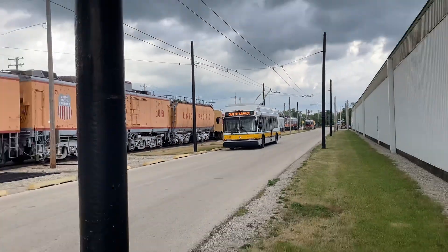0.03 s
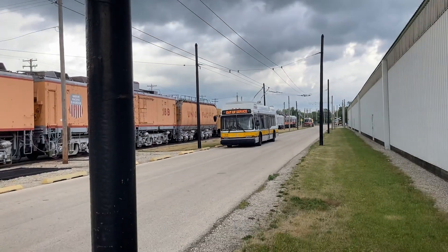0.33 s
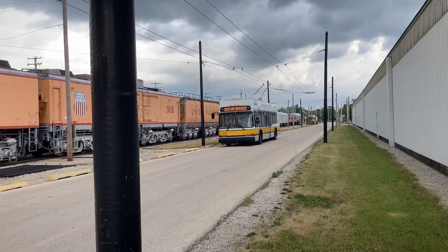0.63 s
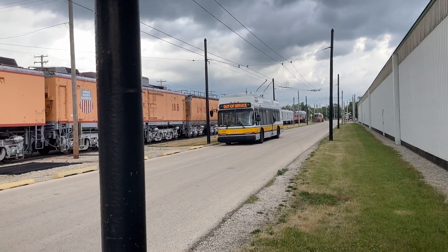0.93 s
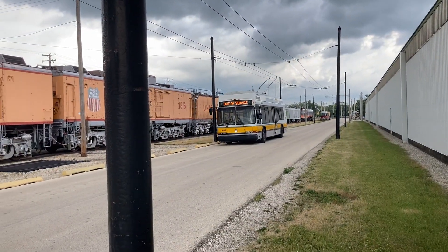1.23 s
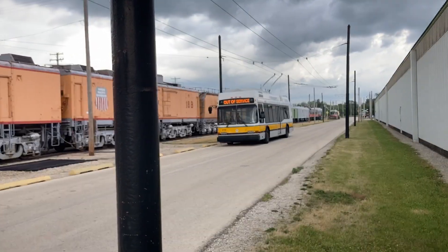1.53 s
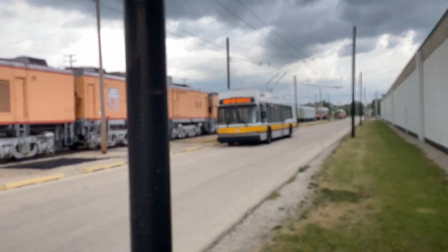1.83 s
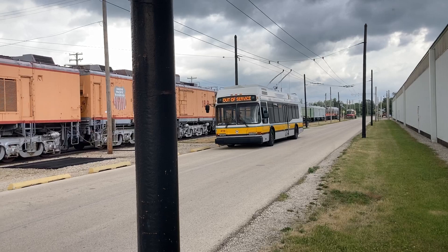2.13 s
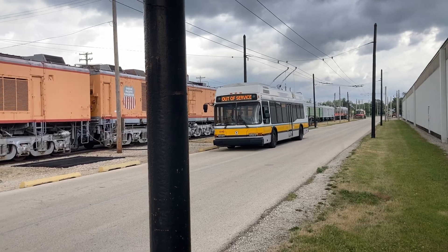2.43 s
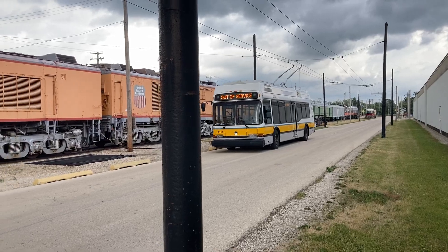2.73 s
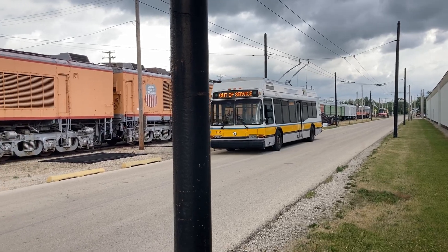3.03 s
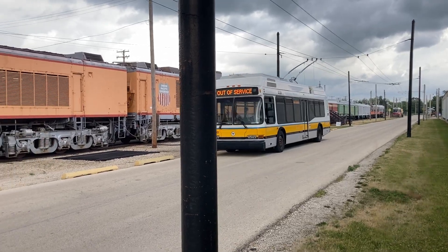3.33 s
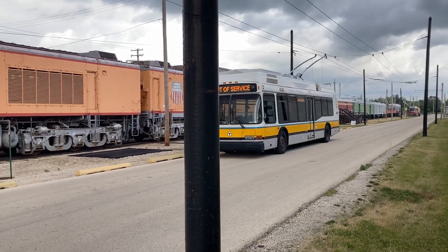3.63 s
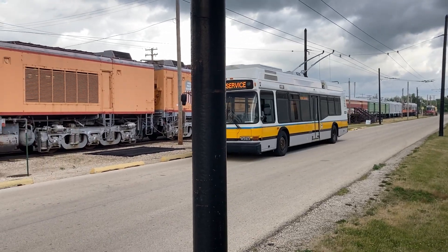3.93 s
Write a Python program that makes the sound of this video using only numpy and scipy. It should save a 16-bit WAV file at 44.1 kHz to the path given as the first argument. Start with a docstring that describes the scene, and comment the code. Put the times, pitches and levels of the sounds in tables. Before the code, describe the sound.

A trolley bus rolls closer outdoors with a low throbbing hum and growing tyre rush, its collectors ticking and singing thinly on the wires. Dull wheel thuds come near 0.8, 2.3 and 2.9 seconds. The motor tone sinks slowly, and a pulsing whirr opens up after 2 seconds. At about 3.2 seconds compressed air spurts softly and settles to a hiss; a hollow body boom swells around 3.8 seconds.

```python
"""A trolley bus rolls slowly closer along a yard road, between parked rail cars and a shed wall.
From the start its machinery throbs in three low tones, the tyres rush and thud, and the collector
shoes tick and sing thinly on the wires. The drive tone sinks as the bus slows. After two seconds
the drive's whirr opens up; just past three, compressed air spurts and settles to a hiss.
Last comes a hollow boom from the body, now close by."""
import sys
import numpy as np
from scipy import signal
from scipy.fft import rfft, irfft, next_fast_len
from scipy.io import wavfile
from scipy.ndimage import uniform_filter1d, map_coordinates

SR = 44100
rng = np.random.default_rng(int(sys.argv[2]) if len(sys.argv) > 2 else 0)


def master_out(mix):
    """Clip the mix to full scale and print it as 16-bit PCM to the path in sys.argv[1]."""
    frames = np.transpose(np.atleast_2d(mix))
    ceiling = np.clip(frames, -1, 1)
    pcm = np.round(ceiling * 32767).astype(np.int16)
    wavfile.write(sys.argv[1], SR, pcm)


N = 176400

# Noise colours, each (frequency [Hz], relative level [dB])
YARD_COLOUR = [(120, -16.5), (250, -9), (345, -7.5), (440, -17), (520, -11.5), (680, -13.5), (820, -14.5),
               (1100, -12), (1550, -21), (2150, -22), (2500, -26), (2900, -25.5), (3300, -29), (4300, -29),
               (5500, -34.5), (8000, -45)]  # distant outdoor wash
FIZZ_COLOUR = [(4000, -34), (5800, -6), (7000, 4.5), (8500, 1), (11500, 2.5), (15500, -6.5)]  # high hiss over the yard
AIR_COLOUR = [(2500, -16), (5000, -4.5), (7200, -2.5), (11000, -1.5), (15500, -4.5)]  # escaping compressed air
TYRE_COLOUR = [(100, -15), (190, 1.5), (300, -14), (400, -9.5), (640, -5.5), (820, -15.5), (1150, -16),
               (1500, -14.5), (2300, -23), (3300, -32), (6000, -64), (15000, -88)]  # tyres on the road
RUMBLE_COLOUR = [(18, -38), (30, -20), (45, -10.5), (68, -4), (95, -5), (118, -10), (160, -16.5),
                 (230, -12), (290, -24), (500, -26.5)]  # the rolling body
BOOM_COLOUR = [(70, -6.5), (120, 4), (165, -1.5), (215, -4), (270, -18), (400, -25)]  # hollow boom of the body up close
KNOCK_COLOUR = [(25, -11), (45, -1), (90, -3), (150, -1.5), (200, -11), (260, -30)]  # dull knock inside a thud

# Stereo images, each (frequency [Hz], left-right correlation [-1 to 1])
YARD_IMAGE = [(60, 0.71), (140, 0.9), (260, 0.86), (500, 0.27), (1000, -0.086), (2000, 0.029),
              (4000, -0.26)]  # centred lows, wide highs
HISS_IMAGE = [(4000, -.2), (6000, -.37), (7000, -.88), (15000, -.88)]  # very wide, largely out of phase
TYRE_IMAGE = [(200, 0.97), (600, 0.7), (1000, 0.11), (1700, 0.5), (3000, 1), (6000, 0.16)]

# Shoes snapping on the wire (time [s], level [dB], centre [Hz], width [octaves], crack length [s])
SHOE_TICKS = [(0.119, -47.5, 4170, .15, 0.0013), (.175, -54, 4940, .12, 0.0012),
              (.404, -57, 3500, .42, .0015), (.682, -53, 4200, .4, .0015),
              (.988, -47.5, 6000, 0.27, 0.0012), (1.079, -58, 6960, .23, .0015),
              (1.422, -50.5, 5800, 0.29, 0.0017), (1.795, -58, 4000, .3, 0.0013),
              (2.062, -49, 4580, 0.14, 0.00097), (2.713, -47.5, 4650, 0.41, 0.0012),
              (3.073, -54, 3170, 0.064, .008), (3.376, -52.5, 7000, 0.15, .0015),
              (3.886, -53, 3230, 0.36, 0.0037)]
# Singing modes of wire and shoe (frequency [Hz], level [dB])
WIRE_MODES = [(2947, -74), (3560, -70.5), (3594, -69.5), (3731, -73.5), (4651, -76), (4915, -77.5),
              (5647, -78), (6115, -78), (6708, -79), (7849, -76)]
# Chirps where one mode swells (time [s], frequency [Hz], level [dB])
WIRE_CHIRPS = [(.69, 5647, -67), (.96, 4915, -69), (1.36, 3594, -63), (1.6, 3594, -58), (1.85, 3594, -62),
               (1.87, 3731, -69), (1.87, 5647, -66), (2.09, 5647, -70), (2.12, 3594, -65), (2.3, 3594, -60),
               (2.5, 3594, -66), (2.75, 3731, -61), (2.77, 6115, -67), (3.22, 6708, -65), (3.45, 5647, -71),
               (3.64, 5647, -68), (3.7, 4915, -61.5), (3.75, 3594, -62)]
# Whirring resonances of the drive (frequency [Hz], width [Hz], level when near [dB])
WHIRR_BANDS = [(1098, 62, -57.5), (1248, 38, -66), (1701, 65, -59.5), (1799, 91, -63), (2336, 51, -70.5),
               (2240, 82, -80)]
# Tone of the drive motor (time [s], pitch [Hz], level [dB])
DRIVE_CURVE = [(0, 259, -50.5), (0.8, 254, -51), (1.4, 251, -51.5), (1.95, 246, -53), (2.45, 243, -45),
               (2.8, 241, -51.5), (3.0, 239.5, -44.5), (3.38, 236.7, -37), (3.62, 235, -43.5),
               (4, 231, -49.5)]
# Low thuds (time [s], peak level [dB], half-width [s])
WHEEL_THUDS = [(0.617, -38, 0.0091), (0.813, -29, 0.019), (2.252, -27.5, 0.029), (2.635, -37, 0.015),
               (2.883, -32, 0.032)]
# Hum of the machinery (starting pitch [Hz], level [dB])
HUM_TONES = [(63.6, -36.5), (76.3, -35.5), (97.5, -37), (334.8, -54.5), (411, -70), (1005, -65),
             (2110, -67), (2148, -66.5)]


def amp(db):
    """Decibels to gain."""
    return 10 ** (np.asarray(db) / 20)


def unit(x):
    """Scale to rms 1."""
    return x / np.sqrt(np.mean(x ** 2) + 1e-20)


def clock():
    """Seconds at each sample."""
    return np.arange(N) / SR


def along(points, hz):
    """Read a (frequency, value) curve on a log frequency axis."""
    freqs, values = np.transpose(points)
    return np.interp(np.log(hz + 1), np.log(freqs + 1), values)


def wobble(rate):
    """Smooth random modulation, rate knots a second."""
    return map_coordinates(rng.standard_normal(2048), [clock() * rate], mode="wrap")


def swell(at_s, half_width_s):
    """A bell-shaped envelope."""
    return np.exp(-.5 * ((clock() - at_s) / half_width_s) ** 2)


def filtered(x, response):
    """Equalise x with a gain given as a function of frequency."""
    size = next_fast_len(N + SR // 4)
    return irfft(rfft(x, size) * response(np.fft.rfftfreq(size, 1 / SR)), size)[..., :N]


def rush(colour, image, patchy_db, left_lead_s=0):
    """Coloured stereo noise of rms 1, textured with patches of random gain."""
    grains = signal.stft(rng.standard_normal((2, N)), nperseg=512)[2]
    patches = uniform_filter1d(rng.standard_normal(grains.shape[1:]), size=4, axis=0)
    patches = uniform_filter1d(patches, size=14, axis=1)
    noise = signal.istft(grains * amp(patchy_db * unit(patches)), nperseg=512)[1][:, :N]
    spread = lambda hz: np.arccos(np.clip(along(image, hz), -1, 1)) / 2
    # the colour rolls off above its last point
    eq = lambda hz: amp(along(colour, hz)) / np.maximum(1, hz / colour[-1][0]) ** 2
    mid, side = filtered(noise, lambda hz: eq(hz) * [np.cos(spread(hz)), np.sin(spread(hz))])
    # the left side is shifted in time only above 810 Hz
    left = filtered(mid + side, lambda hz: np.exp(2j * np.pi * hz * left_lead_s * (hz > 810)))
    return unit(np.array([left, mid - side]))


def hiss(colour):
    """Wide, lightly textured noise, the right side slightly ahead."""
    return rush(colour, HISS_IMAGE, patchy_db=1.8, left_lead_s=-.000227)


def tone(hz, scatter, rate):
    """A stereo tone of rms 1: the direct sound plus wandering reflections at each ear."""
    phase = 2 * np.pi * (np.cumsum(hz * np.ones(N)) / SR + rng.random())
    reflections = [wobble(rate) * np.sin(phase) + wobble(rate) * np.cos(phase) for ear in range(2)]
    return unit(np.sin(phase) + scatter * np.array(reflections))


def yard():
    """The bed: a drifting, distant outdoor wash under a smooth high hiss."""
    wash = amp(-47 + 1.1 * wobble(4)) * rush(YARD_COLOUR, YARD_IMAGE, patchy_db=1.5)
    return wash + amp(-63.5) * hiss(FIZZ_COLOUR)


def compressed_air():
    """Compressed air starts with a spurt and settles to a thin hiss."""
    start_s, attack_s, settle_s = 3.19, 0.11, 0.061
    age = clock() - start_s
    fade_in = np.clip(age / attack_s, 0, 1)
    spurt_db = 5 * np.exp(-np.maximum(age - attack_s, 0) / settle_s)
    return fade_in * amp(-59 + spurt_db + .5 * wobble(21)) * hiss(AIR_COLOUR)


def shoe_ticks():
    """The shoes snap over the wire: a hard crack, its slap off the road and a brief ring."""
    slap_s, slap_db = 0.0054, -9.5
    ring_t60_s, ring_db = .08, -12
    out = np.zeros((2, N))
    for at_s, db, centre, octaves, length in SHOE_TICKS:
        age = clock() - at_s
        crack = lambda delay: np.abs(age - delay - length / 2) < length / 2
        ring = (age > 0) * amp(ring_db - 60 * np.maximum(age, 0) / ring_t60_s)
        envelope = uniform_filter1d(crack(0) + amp(slap_db) * crack(slap_s) + ring, size=32)
        bandpass = lambda hz: np.exp(-.5 * (np.log2((hz + 1) / centre) / octaves) ** 2)
        band = filtered(rng.standard_normal((2, N)), bandpass)
        out += amp(db) * envelope * unit(band + .5 * band[::-1])  # crossfeed narrows the image
    return out


def wire_singing():
    """Sliding shoes stir thin metal modes in rough bursts; now and then one swells into a chirp."""
    flutter_hz, swing_db = 15, 6
    ring = lambda hz: tone(hz + flutter_hz * wobble(200), scatter=.8, rate=50)
    bursts = lambda: amp(swing_db * np.tanh(wobble(19)))
    shimmer = sum(amp(db) * unit(bursts() * ring(hz)) for hz, db in WIRE_MODES)
    chirps = sum(amp(db) * swell(at_s, half_width_s=0.045) * ring(hz) for at_s, hz, db in WIRE_CHIRPS)
    return shimmer + chirps


def drive_whirr():
    """Narrow bands pulse with each turn of the drive and open up once the bus is close."""
    open_s, rise_s, far_db = 2.11, 0.42, -7.5
    pulse_hz, pulse_db = 14.9, 5.5
    far = 1 - np.clip((clock() - open_s) / rise_s, 0, 1)
    turn = np.sin(2 * np.pi * pulse_hz * clock() + 0.68 * wobble(2.9))
    tremolo = unit(amp(pulse_db * turn + 2.7 * wobble(11)))
    bands = sum(amp(db) * tone(hz, scatter=1.1, rate=1.9 * width) for hz, width, db in WHIRR_BANDS)
    return amp(far_db * far) * tremolo * bands


def drive_motor():
    """The motor's tone sinks with the falling road speed."""
    times, pitch_hz, level_db = np.transpose(DRIVE_CURVE)
    glide = np.interp(clock(), times, pitch_hz)
    return amp(np.interp(clock(), times, level_db)) * tone(glide, scatter=0.14, rate=9.8)


def rolling():
    """Tyre noise grows as the distance shrinks, over a steady body rumble."""
    start_m, speed_m_per_s, offset_m = 39.8, 7.35, 8.2
    distance_m = np.hypot(start_m - speed_m_per_s * clock(), offset_m)
    approach = amp(-43 + 0.097 * wobble(6.4)) * 15 / distance_m  # level set at 15 m
    tyres = approach * rush(TYRE_COLOUR, TYRE_IMAGE, patchy_db=3, left_lead_s=0.0004)
    rumble = amp(-38) * rush(RUMBLE_COLOUR, YARD_IMAGE, patchy_db=3)
    return tyres + rumble


def body_boom():
    """The body gives one hollow boom when the bus is close."""
    return amp(-39.5) * swell(at_s=3.78, half_width_s=0.23) * rush(BOOM_COLOUR, YARD_IMAGE, patchy_db=1)


def wheel_thuds():
    """Short bumps, as of wheels over road seams: the body's lowest mode plus a dull knock."""
    bumps = sum(amp(db) * swell(at_s, half_width_s) for at_s, db, half_width_s in WHEEL_THUDS)
    body_mode = tone(hz=57, scatter=0.11, rate=11)
    knock = amp(-5.5) * rush(KNOCK_COLOUR, YARD_IMAGE, patchy_db=-0.5)
    return bumps * (body_mode + knock)


def machinery():
    """Low tones beat into a throb, higher ones arrive more scattered; all sag as the bus draws near."""
    sag_from_s, sag_per_s = 2.2, 0.00867
    sag = 1 - sag_per_s * np.maximum(clock() - sag_from_s, 0)
    return sum(amp(db) * tone(hz * sag, scatter=.12 * hz / 100, rate=4 + hz / 100) for hz, db in HUM_TONES)


def scene():
    """The bus, panned a touch to the right, over the yard bed."""
    bus = machinery() + drive_motor() + rolling() + drive_whirr() + body_boom() + wheel_thuds()
    bus += wire_singing() + shoe_ticks() + compressed_air()
    return bus * amp([[-.3], [.3]]) + yard()


def record(dry):
    """Master EQ: trim the deepest bass and cut the very top."""
    low_cut_hz, high_cut_hz = 22, 15750
    return filtered(dry, lambda hz: (hz < high_cut_hz) * (1 - np.exp(-(hz / low_cut_hz) ** 4)))


dry = scene()
out = record(dry)
master_out(out)
```